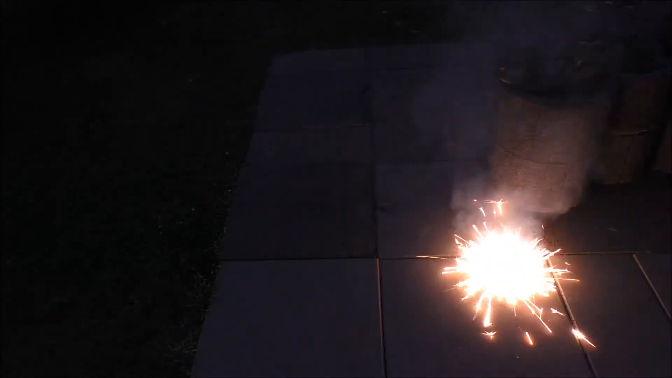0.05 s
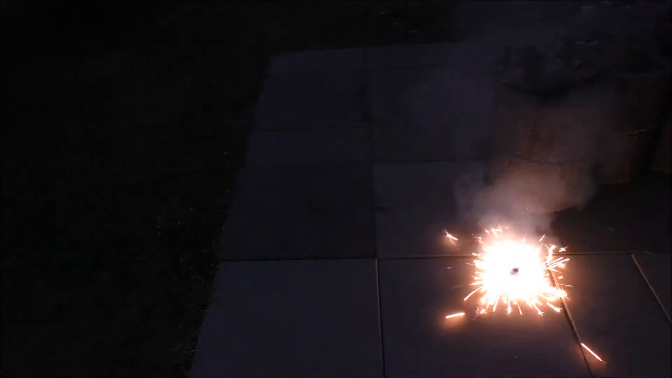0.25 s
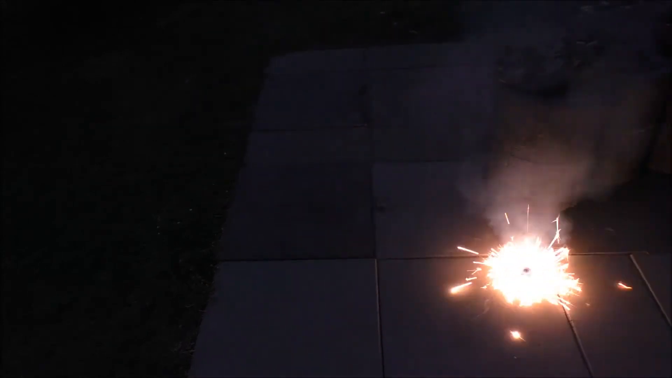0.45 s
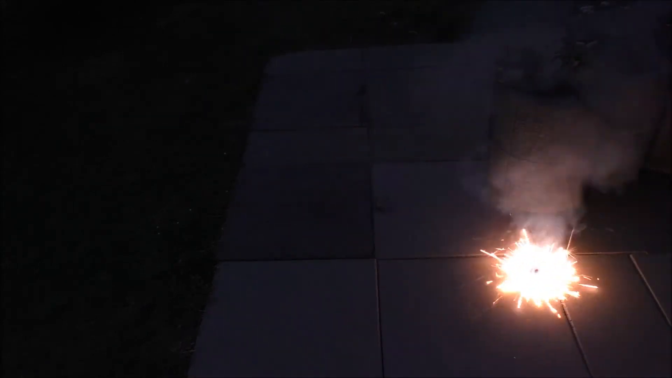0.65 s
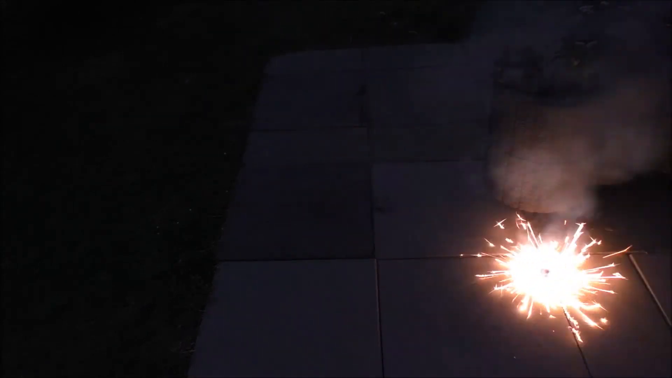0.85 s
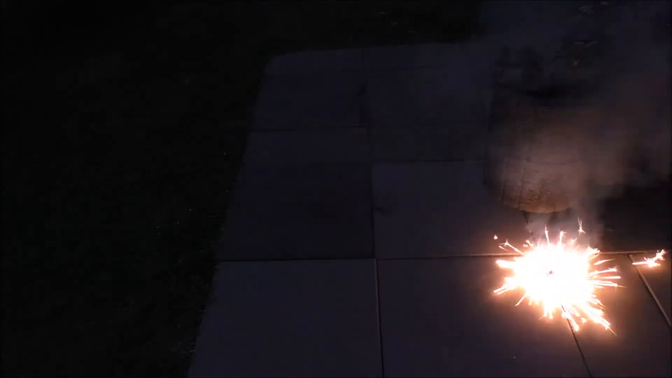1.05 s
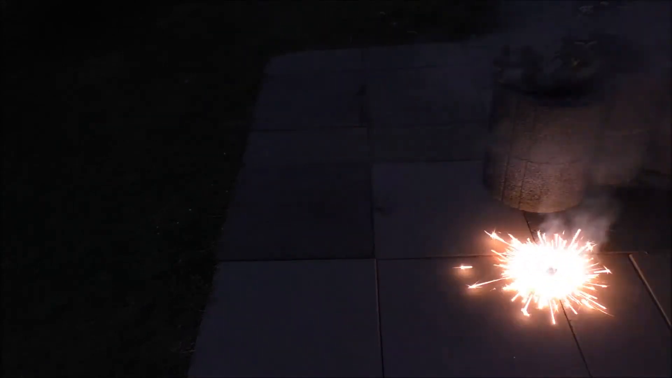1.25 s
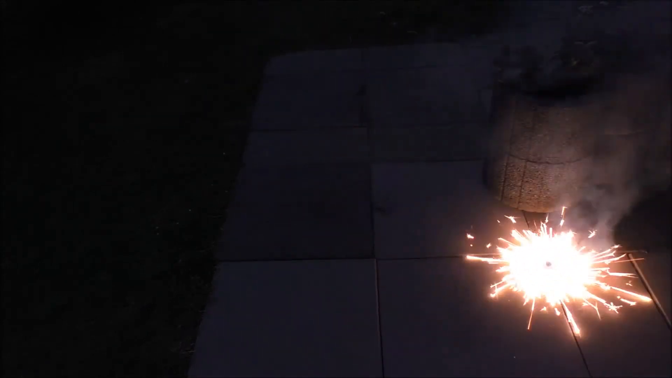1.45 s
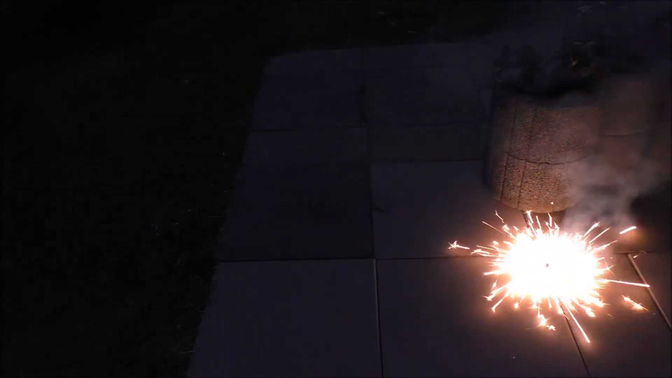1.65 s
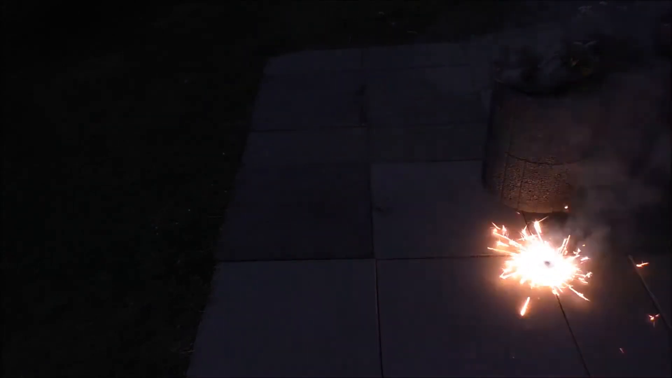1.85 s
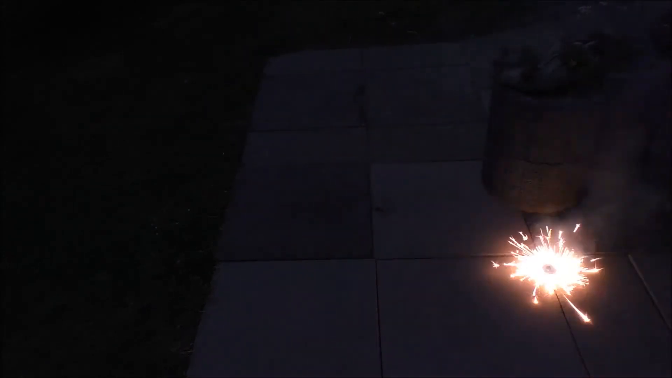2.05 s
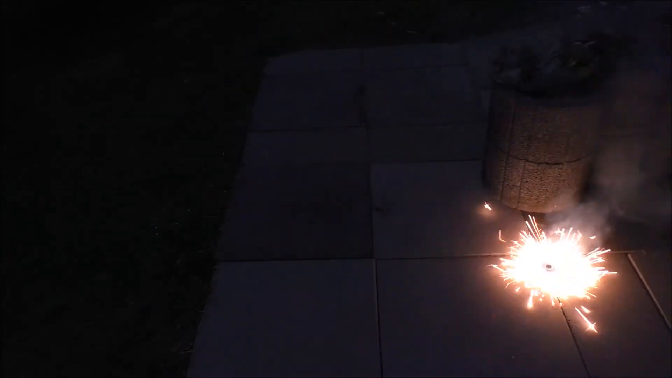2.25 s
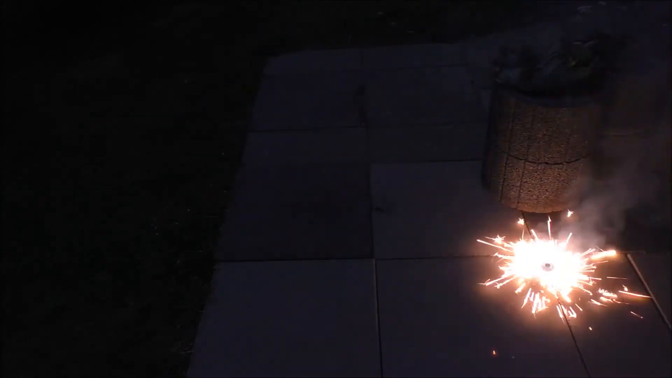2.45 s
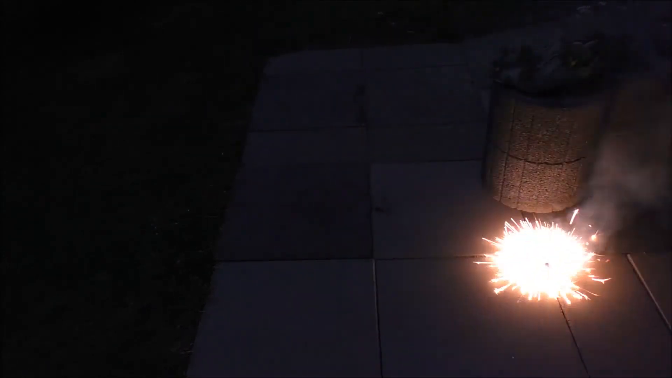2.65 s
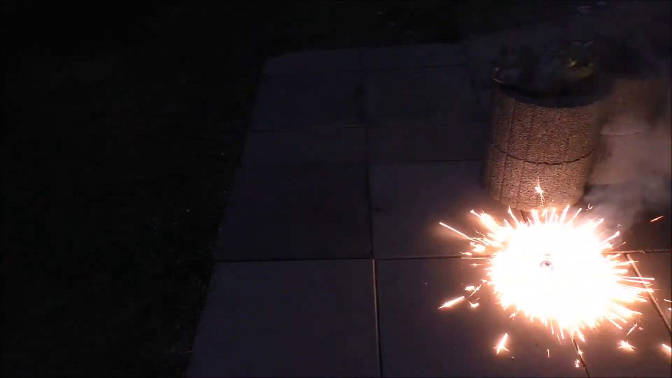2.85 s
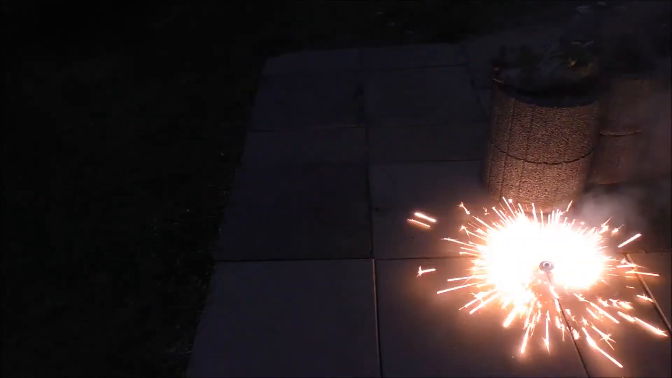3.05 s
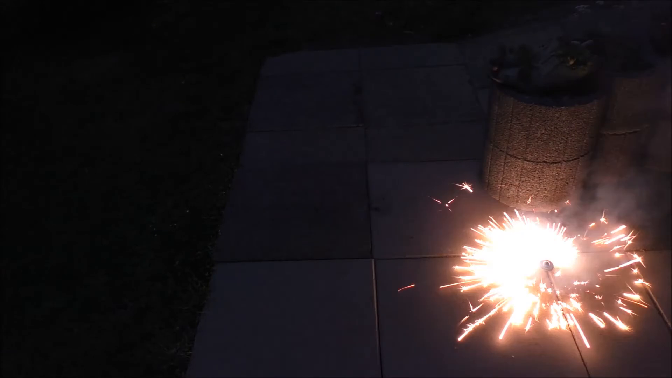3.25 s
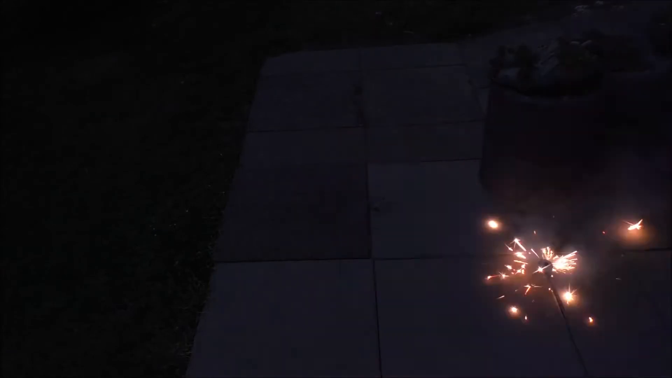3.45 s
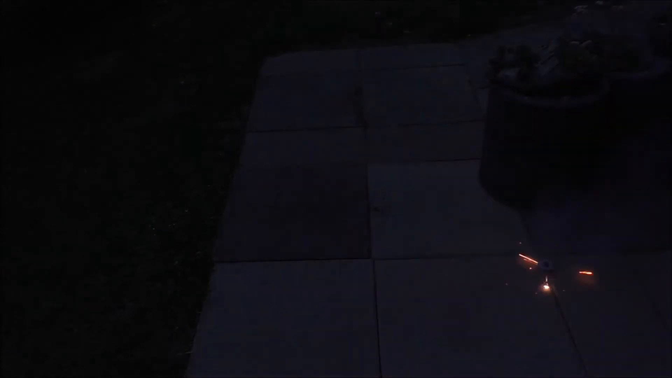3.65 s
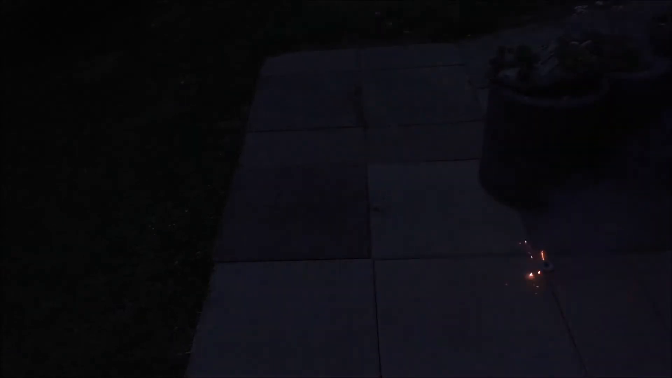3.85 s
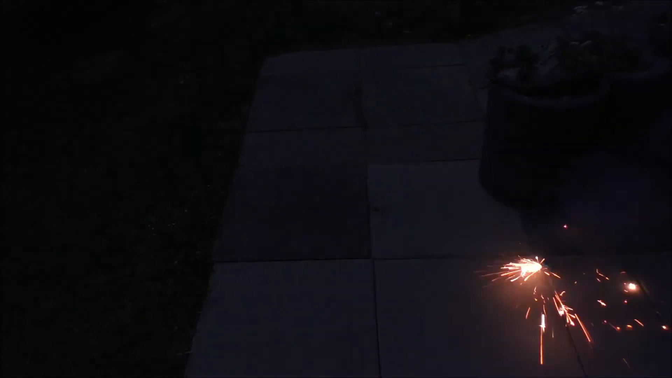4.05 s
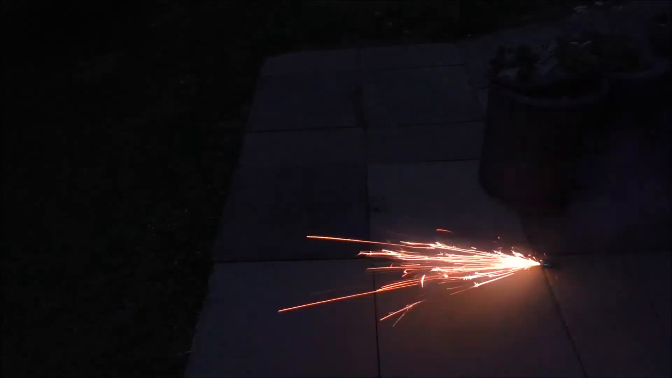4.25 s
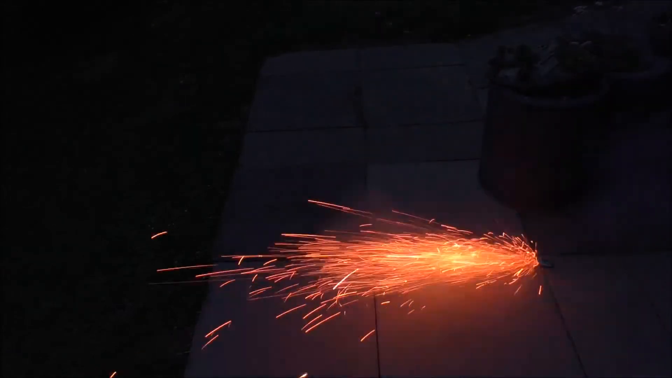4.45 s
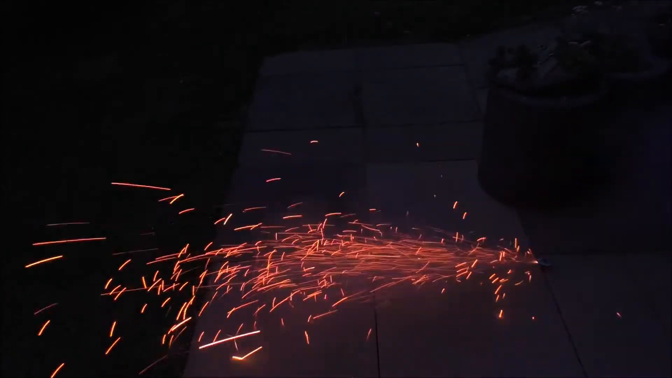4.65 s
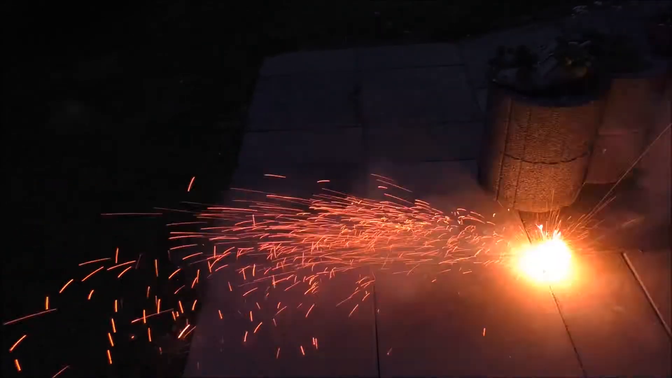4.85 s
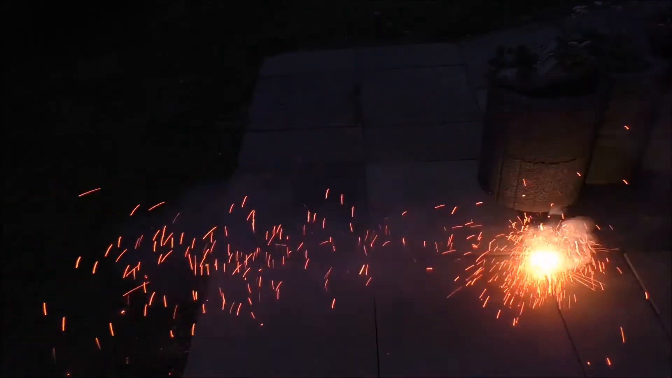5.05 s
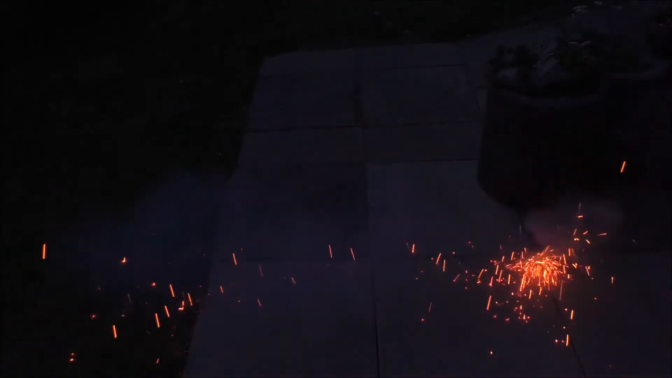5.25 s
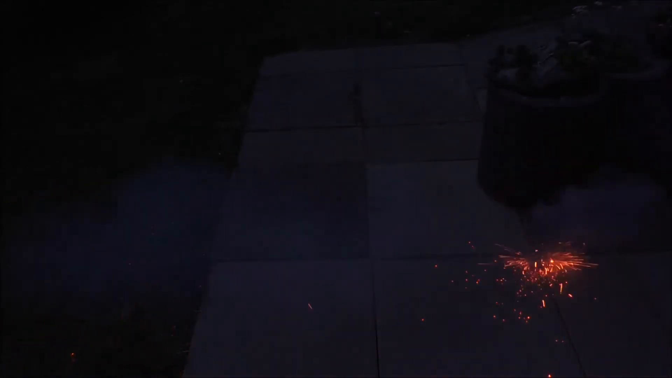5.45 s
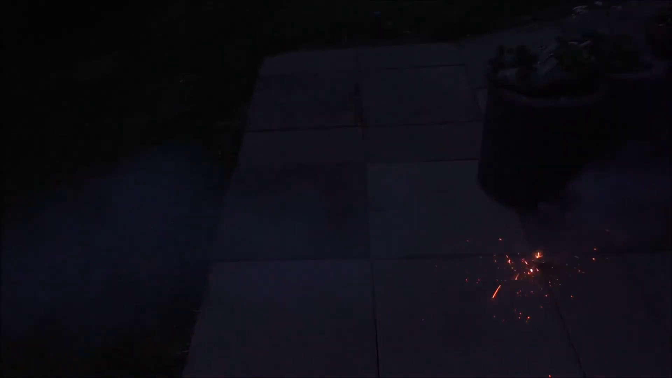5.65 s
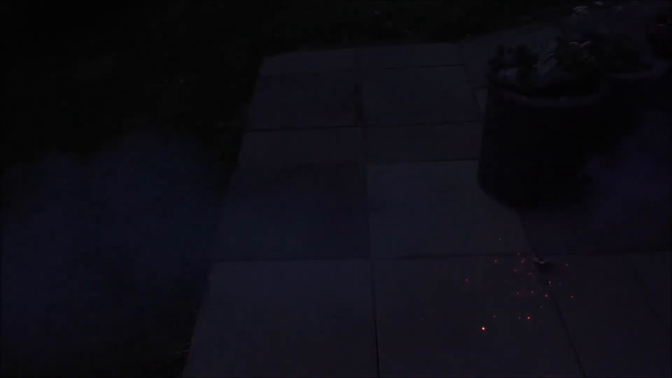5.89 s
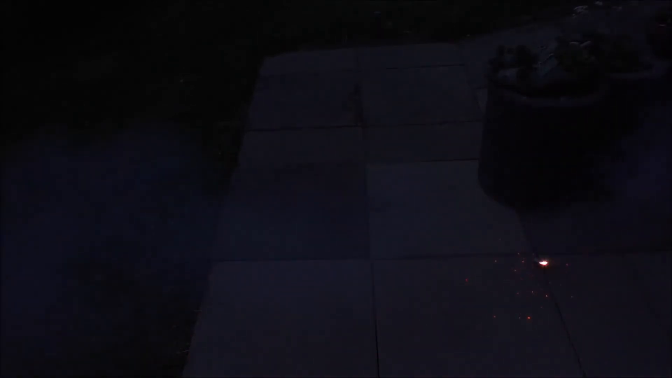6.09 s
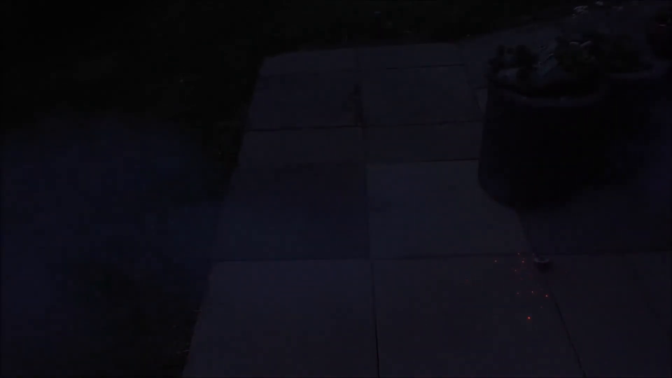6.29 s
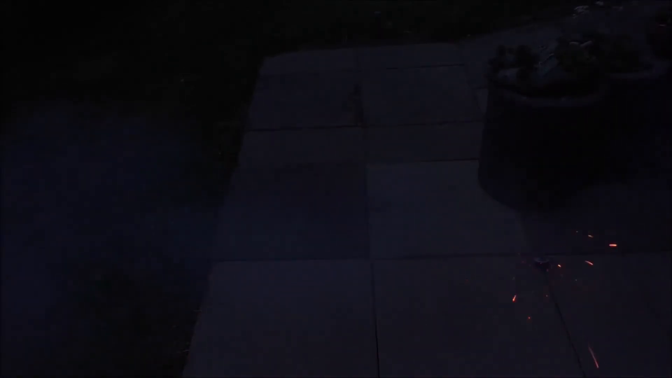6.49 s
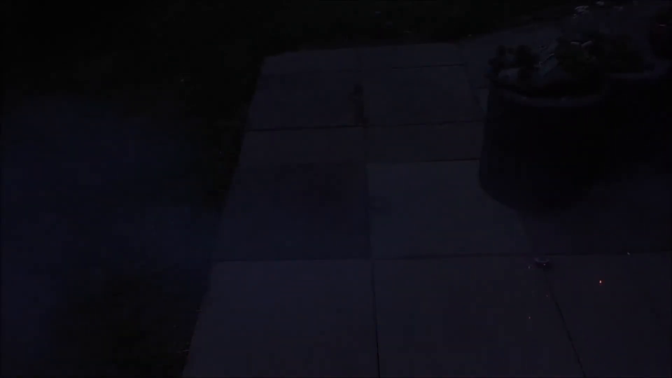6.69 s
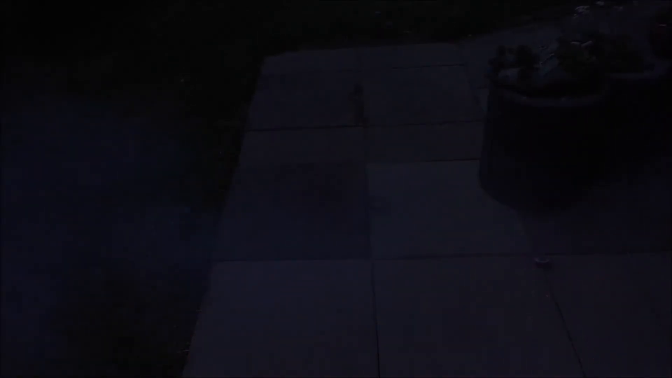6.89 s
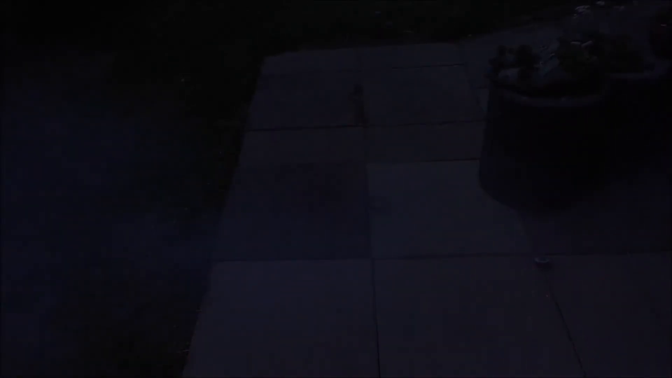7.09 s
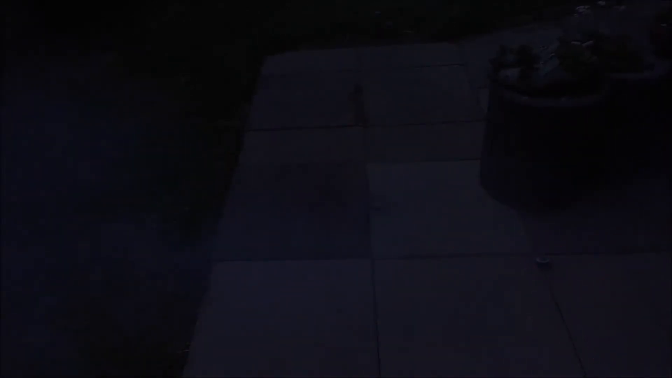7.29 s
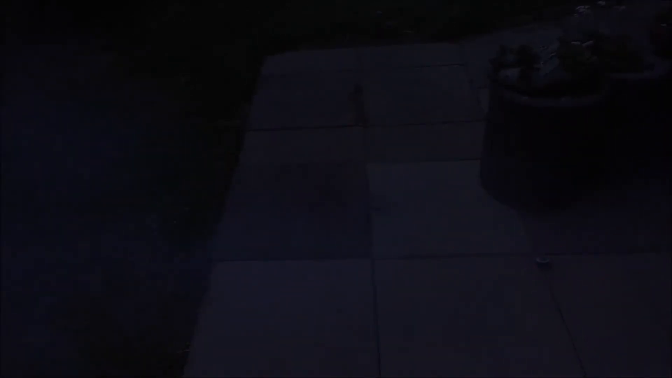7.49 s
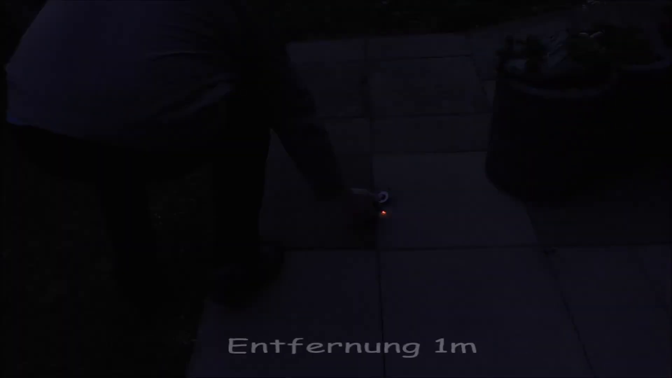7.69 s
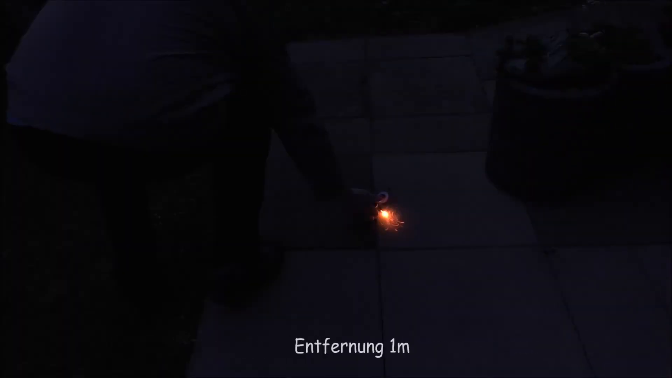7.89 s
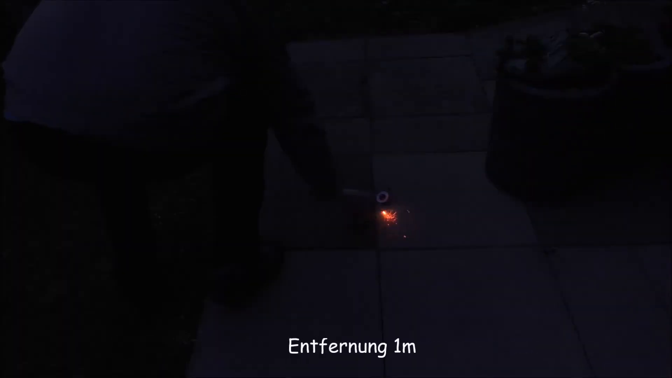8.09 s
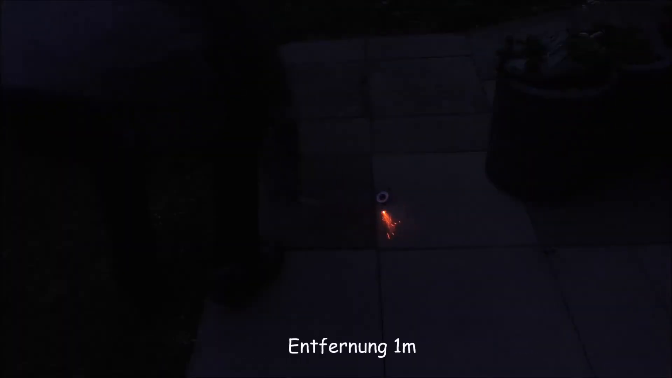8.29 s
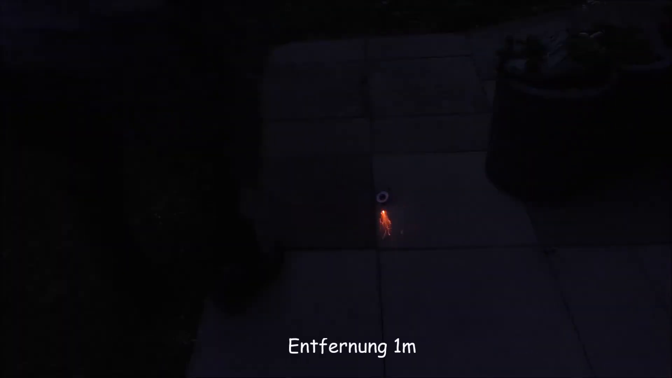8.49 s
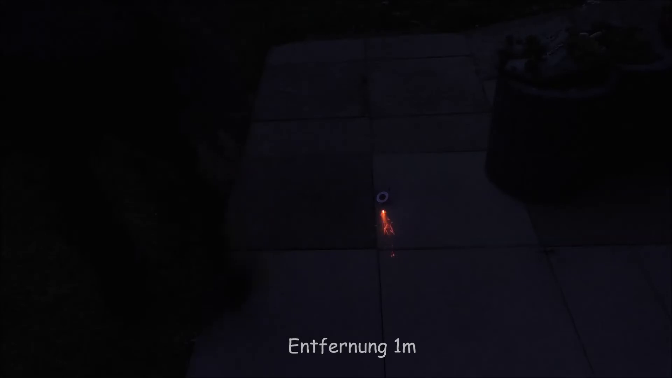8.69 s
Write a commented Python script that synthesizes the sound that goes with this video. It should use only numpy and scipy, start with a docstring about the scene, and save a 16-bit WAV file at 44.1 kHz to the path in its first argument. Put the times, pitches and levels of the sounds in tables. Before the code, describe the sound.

Outdoors on a patio, a nearby firework hisses in uneven swells with ticking sparks while wind rumbles on the microphone. The hiss dips, returns as a brighter rush and dissolves into rapid snaps and loud pops with a short echo. After the last scattered pops come faint distant whistles and traffic, then one bright crack and the quiet fizz of a fresh fuse.

```python
"""Ground firework on a patio at night

Close by, a small firework spins hissing on the slabs, sputters, then blows a bright jet that breaks up
into crackling pops. The pops overload the microphone and echo from the garden. In the lull two faint
whistles sound far off, over the murmur of the town; then a crack lights the next fuse, which fizzes on.
A breeze rumbles on the microphone."""
import sys
import numpy as np
from scipy import signal
from scipy.fft import rfft, irfft, next_fast_len
from scipy.io import wavfile

SR = 44100
rng = np.random.default_rng(int(sys.argv[2]) if len(sys.argv) > 2 else 0)


def wrap_up_sound(samples):
    """Save the sound to the file named by the first command line argument, as 16-bit audio."""
    columns = np.atleast_2d(samples).T
    # keep every value between -1 and 1, then stretch to whole-number steps
    tamed = np.clip(columns, -1, 1)
    steps = np.round(tamed * 32767).astype(np.int16)
    wavfile.write(sys.argv[1], SR, steps)


N = 384993
BOUNCE_MS = 1.05  # the bounce off the slabs reaches the microphone this long after the direct sound


def undb(db):
    """Decibels to gain."""
    return 10 ** (np.asarray(db) / 20)


def unit(x):
    """Scale to rms 1."""
    return x / np.sqrt(np.mean(x ** 2) + 1e-20)


def clock():
    """Time of every sample, s."""
    return np.arange(N) / SR


def curves(table):
    """The columns of a table, joined by straight lines in time."""
    times, *columns = np.transpose(table)
    return [np.interp(clock(), times, column) for column in columns]


def swells(table):
    """Gain of bell-shaped swells, from rows of peak_s, half_width_s, level_db."""
    return sum(undb(db) * np.exp(-np.minimum(((clock() - s) / width) ** 2, 50)) for s, width, db in table)


def colour(x, points):
    """Filter by a spectrum of frequency_hz, gain_db points."""
    size = next_fast_len(len(x))
    hz, db = np.transpose(points)
    bins_hz = np.maximum(np.fft.rfftfreq(size, 1 / SR), 1)
    gain = undb(np.interp(np.log(bins_hz), np.log(hz), db))
    return irfft(rfft(x, size) * gain, size)[:len(x)]


def noise(points):
    """Steady noise of rms 1 with the given spectrum."""
    return unit(colour(rng.standard_normal(N), points))


def cut(x, hz, kind, order=2):
    """Low-pass or high-pass."""
    return signal.sosfilt(signal.butter(order, hz, kind, fs=SR, output="sos"), x)


def walk(rate):
    """Random drift of rms 1 that turns about rate times a second; the rate may be a curve."""
    steps = rng.standard_normal(N // 10)
    place = np.cumsum(np.broadcast_to(rate / SR, N))
    return unit(np.interp(place, np.arange(len(steps)), steps))


def delay(x, ms):
    """The same sound, later."""
    samples = np.arange(len(x))
    return np.interp(samples - ms * SR / 1000, samples, x, left=0)


def blurred_tone(hz, width_hz):
    """A narrow band of noise around a moving pitch."""
    phase = 2 * np.pi * np.cumsum(hz) / SR
    return unit(walk(width_hz) * np.sin(phase) + walk(width_hz) * np.cos(phase))


def glides(table):
    """Blurred tones that slide in pitch, swell quickly and fade slowly."""
    out = np.zeros(N)
    for start, end, start_hz, end_hz, width_hz, db in table:
        progress = np.clip((clock() - start) / (end - start), 0, 1)
        tone = blurred_tone(start_hz + (end_hz - start_hz) * progress, width_hz)
        out += tone * undb(db) * np.interp(progress, [0, .15, .45, 1], [0, 1, .9, 0])
    return out


def sparks(rate):
    """Sparks burst as random ticks, rate a second, mostly small."""
    size_db = 3 * np.minimum(rng.exponential(size=N), 2.5)
    return unit((rng.random(N) < rate / SR) * undb(size_db))


def flame(levels, spectrum, flutter_db, spark_rate, spark_db, bounce_db, wander_ms, wander_rate):
    """Turbulent gas flutters as the powder burns unevenly: a rush, a sizzle above it, ticking sparks."""
    split_hz, fade_s = 6000, .022
    rush_db, sizzle_db = curves(levels)
    flutter = undb(flutter_db * (.56 * walk(35) + .73 * walk(260)))
    direct = rng.standard_normal(N) * flutter + undb(spark_db) * sparks(spark_rate)
    # The bounce off the slabs ripples the spectrum; the ripple shifts as the flame moves.
    bounce = undb(bounce_db) * delay(direct, BOUNCE_MS + wander_ms * walk(wander_rate))
    gas = colour(direct + bounce, spectrum)
    rush = unit(cut(gas, split_hz, "low", order=4)) * undb(rush_db + .5 * walk(50))
    sizzle = unit(cut(gas, split_hz, "high", order=4)) * undb(sizzle_db + 1.4 * walk(76))
    inside_s = np.minimum(clock() - levels[0][0], levels[-1][0] - clock())
    burning = np.clip(inside_s / fade_s + .5, 0, 1)
    return (rush + sizzle) * np.sqrt(burning)


# Rush of the firework spinning close by: time_s, level_db
SPIN_LEVELS = [(0.0, -23.5), (0.05, -23.5), (0.22, -27), (0.35, -25), (1.13, -26.5), (1.33, -24.5),
               (1.38, -27), (1.68, -21), (2.07, -32.5), (2.13, -28), (2.36, -22.5), (2.62, -28),
               (2.82, -19), (3.31, -22.5), (3.38, -25), (3.46, -22), (3.52, -33.5), (3.55, -32)]
# Its spectrum: frequency_hz, gain_db
SPIN_SPECTRUM = [(35, -37), (60, -10), (150, -11.5), (260, -7.5), (480, -7), (950, -7.5), (1500, -9),
                 (2200, -6.5), (3100, -1.5), (4500, -10.5), (7300, -17), (8600, -13.5), (10000, -14.5),
                 (15500, -13.5)]


def spin(sizzle_db=-4.5):
    """The firework spins on the slabs; rush and sizzle rise together as the powder burns harder."""
    levels = [(s, db, db + sizzle_db) for s, db in SPIN_LEVELS]
    return flame(levels, SPIN_SPECTRUM, flutter_db=.75, spark_rate=250, spark_db=-12,
                 bounce_db=-13, wander_ms=.14, wander_rate=40)


# Whistles at the nozzle: start_s, end_s, start_hz, end_hz, width_hz, level_db
NOZZLE_WHISTLES = [(0, 1.2, 8470, 8760, 800, -43), (2.95, 3.6, 8760, 9100, 1300, -37),
                   (3.0, 3.6, 11300, 11700, 1400, -36), (3.55, 4.15, 11700, 12000, 1200, -44)]


def nozzle():
    """Gas leaves the nozzle with thin, rising whistles."""
    return glides(NOZZLE_WHISTLES)


# Breeze on the microphone: time_s, level_db
BREEZE_LEVELS = [(0, -33.5), (3.0, -39), (4.1, -46), (5.3, -61), (6.0, -48), (7.4, -52), (7.9, -63)]
# Its rumble: frequency_hz, gain_db
BREEZE_SPECTRUM = [(10, -7), (18, 0.5), (28, 3), (40, -12), (60, -29), (110, -34), (250, -66.5)]
# Gusts on the microphone: peak_s, half_width_s, rumble_db, buffet_db
BREEZE_GUSTS = [(0.034, .09, -26, -54), (2.38, .1, -36, -56), (3.32, .09, -26, -33), (3.48, .16, -28, -55),
                (6.356, .1, -42, -45.5), (7.6, .025, -47, -45)]


def breeze(waver_db=1.5):
    """Wind rumbles on the microphone and slowly drops; gusts add a higher buffeting."""
    level_db, = curves(BREEZE_LEVELS)
    strength = undb(level_db + waver_db * walk(12))
    gusting = swells([(s, width, db) for s, width, db, _ in BREEZE_GUSTS])
    buffeting = swells([(s, width, db) for s, width, _, db in BREEZE_GUSTS])
    rumble = noise(BREEZE_SPECTRUM)
    buffet = unit(cut(cut(rng.standard_normal(N), 90, "low", order=3), 35, "high"))
    return rumble * (strength + gusting) + buffet * buffeting


def blast(push_ms=.36, suck_ms=.41):
    """Pressure of a tiny explosion: a short push, then a longer suction."""
    ms = np.arange(SR // 40) * 1000 / SR
    return np.exp(-ms / push_ms) / push_ms - np.exp(-ms / suck_ms) / suck_ms


# A spit of hot gas: frequency_hz, gain_db
SPIT_SPECTRUM = [(1500, -24), (4000, -2), (5500, 0), (9000, -2), (12500, -5), (16000, -12.5)]
# Scattering grit: frequency_hz, gain_db
GRIT_SPECTRUM = [(300, -21.5), (1000, -5), (2000, 2), (2800, -4.5), (3800, 0.5), (5000, -11), (12000, -24)]


def pop(thump, ring_db, ring_hz, ring_t60_ms, thump_db, crack_db, crack_ms=.4, grit_db=-7):
    """A grain explodes: a thump, a brief ring, a crack of hot gas and a scatter of grit."""
    ms = np.arange(len(thump)) * 1000 / SR
    spit, grit = rng.standard_normal((2, len(ms)))
    ring = np.sin(2 * np.pi * ring_hz * ms / 1000) * undb(-60 * ms / ring_t60_ms)
    crack = colour(spit, SPIT_SPECTRUM) * np.exp(-ms / crack_ms)
    debris = colour(grit, GRIT_SPECTRUM) * np.exp(-ms / (.33 * ring_t60_ms))
    parts = [(ring, ring_db), (thump, thump_db), (crack, crack_db), (debris, ring_db + grit_db)]
    # Each level is the rms of that part with its energy packed into 1 ms.
    return sum(unit(x) * undb(db) for x, db in parts) / np.sqrt(ms[-1])


def bursts(rows, bounce_db=-8):
    """Pops just above the slabs, from rows of start_s, ring_db, ring_hz, t60_ms, thump_db, crack_db."""
    out, wave = np.zeros(N + SR), blast()
    thump = cut(wave + undb(bounce_db) * delay(wave, BOUNCE_MS), 3000, "low")
    for s, *shape in rows:
        sound, start = pop(thump, *shape), int(s * SR)
        out[start:start + len(sound)] += sound
    return out[:N]


# Ring of the pops, lower while the jet still blows: time_s, pitch_hz
RING_PITCHES = [(4.5, 2740), (5.3, 3070), (6.3, 2974)]


def ring_pitch(s, scatter=.025):
    """Pitch of a pop at that time, Hz; no two grains ring quite alike."""
    return np.interp(s, *np.transpose(RING_PITCHES)) * (1 + scatter * rng.standard_normal())


# Sharp pops on the patio, then one faint click: start_s, ring_db, ring_t60_ms, thump_db, crack_db
POPS_AND_CLICK = [(0.0483, -16.5, 9, -33, -29), (4.2729, -12, 6, -18, -20), (4.2845, -20.5, 6, -11, -19.5),
                  (4.3853, -17.5, 5.6, -5, -19.5), (4.4903, -3.5, 3.2, -4.5, -20),
                  (4.5544, -17, 8.3, -13, -21), (4.5599, -13, 5, -16.5, -17.5), (4.586, -3.5, 1.7, -9, -27),
                  (4.601, -4.5, 8.9, -11.5, -5.5), (4.7266, -14.5, 4, -21, -19.5),
                  (4.7488, -11, 12, -6, -15.5), (4.766, -16, 8.9, -6, -14), (4.7746, -13, 5, -13, -26),
                  (4.8056, -17, 22, -10.5, -16), (4.8568, -14, 7.7, -3, -13),
                  (4.8642, -2.5, 4.1, -16, -23.5), (5.075, 0.5, 4.6, -3.5, 5), (5.1107, -12, 7, -12, -30.5),
                  (5.2225, 2.5, 4.9, -9, -3.5), (5.2419, -7, 4.7, -27.5, -23.5), (5.335, -3, 5.6, -10, -10),
                  (5.3883, -3.5, 3.8, -31, -13.5), (5.501, -7.5, 4.4, -18, -12),
                  (5.5604, 0, 7.1, -15.5, -8), (5.7163, -36, 7, -40, -40), (5.7311, -16.5, 7, -37, -23),
                  (5.7717, -22, 16, -37, -35), (5.805, -23.5, 5.6, -60, -47), (5.97, -29, 20, -55, -37),
                  (6.178, -3.5, 5.5, -17.5, -21), (6.4564, -5.5, 4.6, -3, -12),
                  (6.6385, 0, 10.6, -16, -23.5), (7.62, -41, 17, -43, -50)]


def pops_and_click():
    """Sharp pops, and one faint click just before the next fuse."""
    return bursts([(s, db, ring_pitch(s), *shape) for s, db, *shape in POPS_AND_CLICK])


# Echo from the garden around the patio: frequency_hz, gain_db
GARDEN_SPECTRUM = [(40, -36), (120, -13.5), (400, -3), (2300, -5), (3000, -1.5), (3400, 1.5), (4100, -4),
                   (5500, -3), (9000, -4.5), (16000, -19)]


def garden(x, wall_ms=11.9, wall_db=-21, near_db=-21, far_db=-24.5):
    """One clear echo from a wall, quick scatter from pots and fences, a far tail that dulls as it dies."""
    near_t60_s, far_t60_s, treble_t60_s = .086, .55, .2
    t = clock()[:SR]
    near, far = (colour(rng.standard_normal(SR), GARDEN_SPECTRUM) for _ in range(2))
    scatter = near * undb(-60 * t / near_t60_s)
    tail = cut(far, 4500, "low", order=4) * undb(-60 * t / far_t60_s)
    tail += cut(far, 5000, "high", order=4) * undb(-60 * t / treble_t60_s)
    response = (unit(scatter) * undb(near_db) + unit(tail) * undb(far_db)) / np.sqrt(SR)
    return undb(wall_db) * delay(x, wall_ms) + signal.fftconvolve(x, delay(response, ms=2.8))[:N]


# Flares on the patio: peak_s, half_width_s, level_db
GAS_FLARES = [(2.718, 0.0083, -24), (3.262, 0.017, -22), (3.545, 0.016, -34), (5.082, .008, -27),
              (8.138, 0.0041, -38), (8.37, .045, -45)]


def flares():
    """Hot gas escapes in short, bright spits."""
    return noise(SPIT_SPECTRUM) * swells(GAS_FLARES)


# The flame sputtering on the slabs: time_s, rush_db, sizzle_db
SPUTTER_LEVELS = [(3.55, -29, -28), (3.568, -32, -32), (3.588, -34.5, -43), (3.87, -36.5, -50),
                  (3.89, -36, -41), (3.9, -38.5, -47), (3.968, -35.5, -39), (4.0, -34, -31)]
# Its spectrum: frequency_hz, gain_db
SPUTTER_SPECTRUM = [(59, -28), (100, 1.5), (189, -11.5), (249, -5), (481, -9.5), (705, -5), (801, -10),
                    (950, -3), (1580, -8.5), (2990, -4), (7450, -29.5), (9020, -19.5), (10200, -25),
                    (11600, -17), (16000, -31)]


def sputter():
    """After the spin the flame burns low and its sparks stand out."""
    return flame(SPUTTER_LEVELS, SPUTTER_SPECTRUM, flutter_db=1, spark_rate=130, spark_db=-5.5,
                 bounce_db=-17, wander_ms=.065, wander_rate=10)


# The jet at close range: time_s, rush_db, sizzle_db
JET_LEVELS = [(4.0, -30, -32), (4.018, -23, -29.5), (4.172, -22.5, -18.5), (4.29, -20.5, -19),
              (4.32, -25, -21.5)]
# Its spectrum: frequency_hz, gain_db
JET_SPECTRUM = [(40, -31), (80, -11), (250, -6.5), (450, -6), (950, -4), (1500, -8), (1900, -3),
                (2300, -6.5), (2700, 0.5), (3550, -0.5), (4600, -11.5), (8000, -5.5), (12700, 3.5),
                (16000, -1.5)]


def jet():
    """Gas blows out in a bright jet, dense with fine sparks."""
    return flame(JET_LEVELS, JET_SPECTRUM, flutter_db=.9, spark_rate=440, spark_db=-18.5,
                 bounce_db=-16.5, wander_ms=.085, wander_rate=8.7)


# The jet dying on the slabs: time_s, rush_db, sizzle_db
EMBER_LEVELS = [(4.32, -28, -23.5), (4.55, -26, -25.5), (4.64, -39, -35), (4.77, -28.5, -24),
                (4.92, -37.5, -45.5), (5.16, -41.5, -58), (5.7, -60, -71)]


def embers():
    """The jet breaks up, fluttering hard as it fades."""
    return flame(EMBER_LEVELS, JET_SPECTRUM, flutter_db=4, spark_rate=130, spark_db=-14.5,
                 bounce_db=-10.5, wander_ms=.099, wander_rate=6.2)


def patter(count=32, start_s=4.33, length_s=1.2, thinning=1.5, ring_t60_ms=6.7):
    """Soft pops at random thin out, weaken and lose their thump as the powder runs out."""
    first_db, spread_db, fade_db_per_s, thump_fade_db_per_s = -21, 4, 3, 13
    rows = []
    for k, (place, size) in enumerate(rng.random((count, 2))):
        age_s = length_s * ((k + place) / count) ** thinning
        s = start_s + age_s
        ring_db = first_db - fade_db_per_s * age_s + spread_db * (2 * size - 1)
        thump_db = ring_db + 1 - thump_fade_db_per_s * age_s
        crack_db = ring_db - 8
        rows.append((s, ring_db, ring_pitch(s), ring_t60_ms, thump_db, crack_db))
    return bursts(rows)


# Spurts among the pops: peak_s, half_width_s, level_db
GRAIN_SPURTS = [(4.379, 0.0028, -16), (4.694, .003, -24), (5.144, 0.0046, -21.5), (5.229, .005, -18.5),
                (5.32, 0.0054, -21.5), (5.4385, .003, -13), (5.621, 0.0032, -18.5), (5.756, 0.0047, -35)]
# Their spectrum: frequency_hz, gain_db
SPURT_SPECTRUM = [(80, -25.5), (200, -7), (600, -14.5), (2000, -14.5), (2900, 0), (3800, -4.5),
                  (5000, -16.5), (9000, -23), (16000, -27)]


def spurts():
    """Some grains flare up instead of bursting."""
    return noise(SPURT_SPECTRUM) * swells(GRAIN_SPURTS)


# Surges of the nearby jet: peak_s, half_width_s, level_db
JET_CHUFFS = [(4.51, .12, -30.5), (4.81, 0.074, -27)]


def chuffs():
    """The jet surges in soft chuffs, each a cluster of tiny, dull blasts."""
    blasts = signal.fftconvolve(sparks(rate=140), blast())[:N]
    dull = cut(cut(blasts, 1500, "low"), 90, "high")
    return unit(dull) * swells(JET_CHUFFS)


def sinking_pitch(s, start_s=4.89, start_hz=8000, end_hz=3210, sink_s=.2):
    """The pitch shared by the snaps and the ringing tail sinks and settles, Hz."""
    return end_hz + (start_hz - end_hz) * np.exp(-np.maximum(s - start_s, 0) / sink_s)


# Snaps on the patio: start_s, ring_db, thump_db
HIGH_SNAPS = [(4.8939, -19, -10), (4.901, -8.5, -16.5), (4.9099, -4.5, -21.5), (4.9443, -22, -29.5),
              (4.9554, -11, -25), (4.962, -6.5, -13), (4.9769, -14, -25)]


def snaps(ring_t60_ms=2.5, crack_db=-.5):
    """A quick run of high snaps, each ringing lower than the last."""
    return bursts([(s, db, sinking_pitch(s), ring_t60_ms, thump_db, db + crack_db)
                   for s, db, thump_db in HIGH_SNAPS])


# Ringing after the snaps and pops: start_s, level_db, fade_db_per_s
TAIL_DECAYS = [(4.895, -35.5, 65), (5.225, -37, 49.5), (5.56, -43, 121)]


def ringing_tail(width_hz=380, at_hz=3300, widening=3.6, attack_s=.011):
    """Ringing tail after the snaps and pops: a band of noise that sinks, narrows and fades."""
    t = clock()
    hz = sinking_pitch(t)
    band_hz = np.minimum(width_hz * (hz / at_hz) ** widening, SR / 10)
    envelope = sum(np.clip((t - s) / attack_s, 0, 1) * undb(db - fade * np.maximum(t - s, 0))
                   for s, db, fade in TAIL_DECAYS)
    return blurred_tone(hz, band_hz) * envelope


# The town, far beyond the garden: time_s, level_db
TOWN_LEVELS = [(5.9, -63.5), (7.0, -54), (7.85, -49)]
# Its spectrum from the patio: frequency_hz, gain_db
TOWN_SPECTRUM = [(24, -25.5), (50, -6.5), (110, -0.5), (165, -6), (250, -12.5), (650, -18), (1100, -25.5),
                 (1850, -30.5), (3200, -27.5), (6000, -41.5), (16000, -47)]


def town(waver_db=1):
    """Far traffic makes a low murmur that swells in the lull."""
    level_db, = curves(TOWN_LEVELS)
    return noise(TOWN_SPECTRUM) * undb(level_db + waver_db * walk(5.6))


# Whistles and an engine, far off: start_s, end_s, start_hz, end_hz, width_hz, level_db
DISTANT_TONES = [(6.923, 7.39, 4080, 4300, 520, -58.5), (6.93, 7.3, 4660, 5020, 1200, -65.5),
                 (7.162, 7.622, 7110, 7000, 110, -68.5), (7.425, 7.475, 4400, 5600, 400, -67),
                 (7.55, 8.5, 168, 173, 7, -48)]


def distant_whistles_and_engine():
    """Faint whistles carry to the patio, then an engine's hum."""
    return glides(DISTANT_TONES)


def ignition(start_s=7.7528, ring_db=-5.5, ring_hz=3300, ring_t60_ms=4, thump_db=-50, crack_db=-6.5):
    """A thin, bright crack with no body lights the next fuse."""
    crack = bursts([(start_s, ring_db, ring_hz, ring_t60_ms, thump_db, crack_db)])
    return cut(crack, 1300, "high", order=4)


# The next fuse on the patio: frequency_hz, gain_db
FUSE_SPECTRUM = [(47, -38), (80, -27), (174, 1), (203, -4.5), (431, 1), (877, -11), (1460, 0),
                 (1950, -10.5), (2330, 2), (2780, -6.5), (3100, -2.5), (5640, -23), (7870, -27),
                 (12000, -26), (16000, -33)]


def fuse(start_s=7.82, rise_s=.067, rise_db=8, level_db=-37, sizzle_db=-7.3, waver_db=1):
    """The fuse catches and fizzes on, wavering a little."""
    burn = [(start_s, level_db - rise_db), (start_s + rise_s, level_db), (N / SR + 1, level_db)]
    levels = [(s, db, db + sizzle_db) for s, db in burn]
    fizz = flame(levels, FUSE_SPECTRUM, flutter_db=1.3, spark_rate=110, spark_db=-15.5,
                 bounce_db=-9, wander_ms=.012, wander_rate=6)
    return fizz * undb(waver_db * walk(16))


def scene():
    """One microphone on the patio: the firework close, the garden around it, the town far off."""
    flames = spin() + sputter() + jet() + embers()
    crackle = pops_and_click() + patter() + spurts() + chuffs() + snaps() + ignition()
    firework = flames + nozzle() + flares() + ringing_tail() + crackle + garden(crackle)
    mono = firework + fuse() + breeze() + town() + distant_whistles_and_engine()
    return np.array([mono, mono])


def record(dry, top_hz=15950):
    """The microphone clips on the loudest pops, and the highest treble is cut."""
    clipped = np.clip(dry, -1, 1)
    return signal.sosfilt(signal.ellip(12, .2, 70, top_hz, fs=SR, output="sos"), clipped)


dry = scene()
out = record(dry)
wrap_up_sound(out)
```